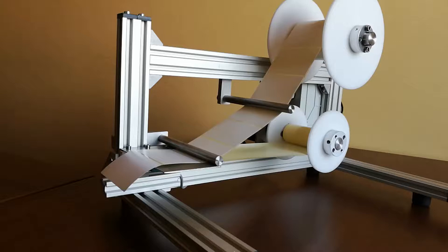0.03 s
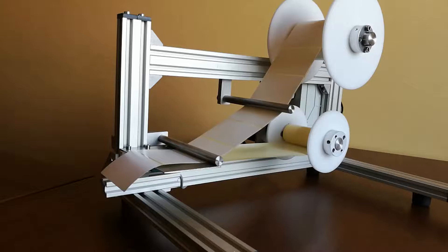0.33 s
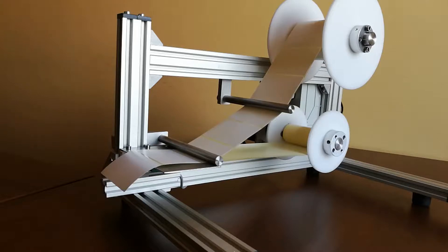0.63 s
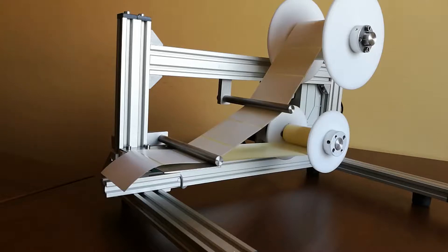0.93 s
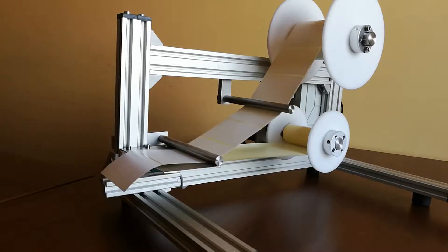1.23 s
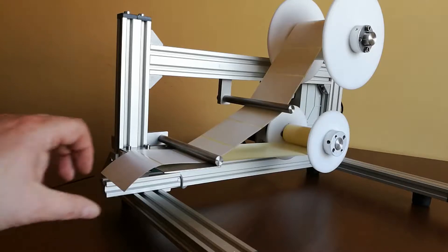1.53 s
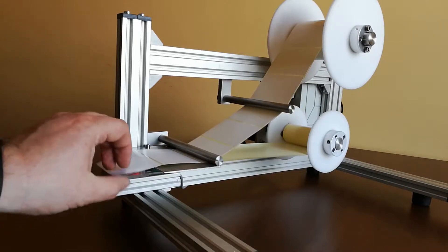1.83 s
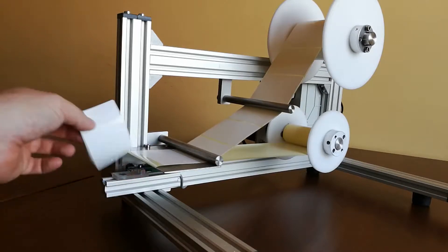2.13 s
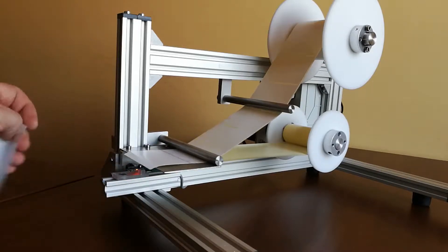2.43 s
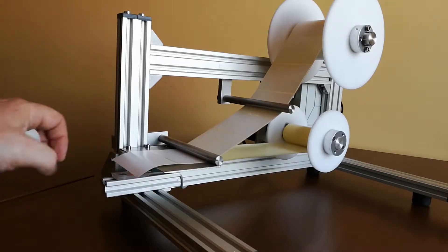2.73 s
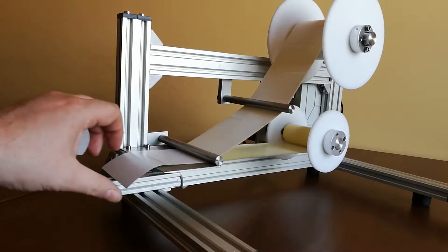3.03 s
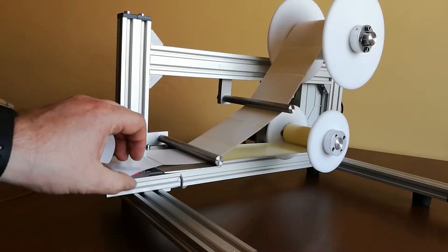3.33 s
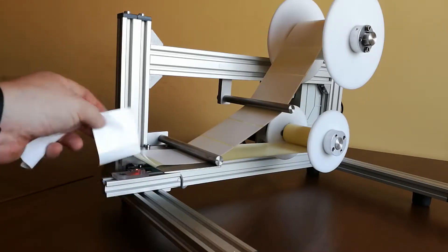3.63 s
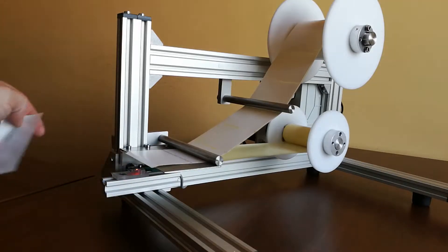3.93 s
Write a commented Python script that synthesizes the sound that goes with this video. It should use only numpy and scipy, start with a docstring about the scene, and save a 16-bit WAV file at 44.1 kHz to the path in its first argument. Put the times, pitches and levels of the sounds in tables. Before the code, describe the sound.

Close up in a small room, light clicks and rustles lead to a label being peeled off, and a dispenser motor whines for a second, shaking the table. Another label snaps free and the motor runs again briefly.

```python
"""Stepper-driven label dispenser on a table in a small room. Twice a hand snaps a label off its backing
and the motor feeds the next: step tone with overtones, frame thrum, mechanism ticks, table rumble.
The driver's current chopper hisses while the motor steps and whistles thinly while it rests.
Close by: handling clicks, crinkling paper, a swishing sleeve. Dull room noise underneath."""
import sys
import numpy as np
from scipy import signal
from scipy.fft import rfft, irfft, next_fast_len
from scipy.io import wavfile
from scipy.ndimage import map_coordinates

SR = 44100
rng = np.random.default_rng(int(sys.argv[2]) if len(sys.argv) > 2 else 0)


def int16_out(signal):
    """Quantize to a 16-bit WAV file."""
    q = np.round(np.clip(np.atleast_2d(signal).T, -1, 1) * 32767)
    wavfile.write(sys.argv[1], SR, q.astype(np.int16))


N = 176400

# motor runs: start/s, stop/s
FEEDS = [(2.114, 3.093), (3.647, 4.1)]
# step tone: t/s, left/dB, right/dB, left lead/rad
STEP_TONE = [(2.14, -44, -42, -.5), (2.2, -37.5, -51, 0), (2.24, -37, -61, -2.7), (2.35, -36, -45.5, -2.7),
             (2.58, -41, -40.5, -3.5), (2.68, -42, -42, -3.6), (2.74, -48, -38, -5),
             (2.92, -45.5, -38.5, -5.5), (3.08, -45, -37.5, -5.7), (3.68, -49, -40, -6.5),
             (3.77, -55, -43, -6.3), (3.86, -45, -41, -6.7), (4, -44.5, -41.5, -6.3)]
# whine at 3x step rate: t/s, left/dB, right/dB, left lead/rad
WHINE = [(2.25, -55, -44, -2), (2.422, -43.5, -42, -2.5), (2.6, -49, -41, -2), (2.86, -48, -50.5, 0.6),
         (3.08, -45, -51.5, 1.3), (3.68, -42.5, -51, 1.6), (3.82, -39.5, -49, -0.5), (4, -37.5, -63, 1.8)]
# weak overtones: multiple, left/dB, right/dB
OVERTONES = [(2, -56.5, -58.5), (4, -51, -56.5), (5, -61, -62), (6, -63, -58), (7, -69, -59.5)]
# frame tones: f/Hz, level/dB
THRUM = [(100.1, -49), (152.3, -56.5), (901.5, -63), (1552, -70)]

# driver hiss: f/Hz, gain/dB
HISS_SPECTRUM = [(300, -8), (600, -16), (900, -2), (2000, -1.5), (3600, 0.5), (5200, -2), (8000, -4),
                 (11200, -5), (12500, -7.5), (14000, -5)]
# hiss balance: f/Hz, L-R/dB
HISS_PAN = [(400, -4.5), (2400, -3.5), (4400, 1), (8100, 2), (11000, 14), (14000, -5.5)]
# chopper band: f/Hz, gain/dB
CHOPPER_SPECTRUM = [(12000, -45), (14200, -45), (15000, 0), (15400, -5), (15750, -14), (15900, -51)]
# resting whistle, right side: t/s, level/dB
WHISTLE_LEVEL = [(.11, -67), (.2, -49.5), (.5, -40.5), (.87, -50.5), (1.1, -44), (1.5, -50), (2.1, -49),
                 (3.1, -48), (3.22, -35.5), (3.33, -38.5), (3.66, -34.5)]
# whistle pitch: t/s, f/Hz
WHISTLE_PITCH = [(0, 15150), (3, 15151), (3.1, 15190), (3.2, 15138), (3.65, 15130)]

# mechanism ticks: t/s, relative level/dB, treble/dB, L-R/dB
TICKS = [(2.131, -20, -6, 4), (2.5205, -14, -22.5, 8), (2.571, -30, 4, 19.5), (3.672, -27.5, 10, 15.5),
         (3.8705, -24.5, -13, 6.5), (3.985, -31, -22, 7)]
# tick body: f/Hz, gain/dB
TICK_SPECTRUM = [(400, -29), (2500, -18), (4000, -4.5), (5200, 0.5), (6200, -7), (9500, -3.5), (11400, 4.5),
                 (14000, -12), (17000, -17)]
# backing web slips: t/s, length/s, level/dB, L-R/dB
WEB_SLIPS = [(2.525, 0.047, -41, 4)]
# web friction: f/Hz, gain/dB
WEB_SPECTRUM = [(500, -12.5), (1400, -1.5), (3000, -1.5), (5000, -8), (12000, -8.5), (16000, -23)]

# reel and frame rumble: t/s, relative level/dB
RUMBLE_LEVEL = [(2.05, -108), (2.146, -43), (4.0, -47.5)]
# rumble: f/Hz, gain/dB
RUMBLE_SPECTRUM = [(30, -20), (50, -5), (69, -5), (88, -7), (135, 6), (180, -7), (260, -6),
                   (500, -40), (900, -64)]
# frame jolts on start, pull and stop: t/s, level/dB
JOLTS = [(2.128, -45), (2.324, -43), (2.378, -52), (3.1, -42.5), (3.15, -43), (3.663, -45.5), (3.83, -41.5)]
# table sway: t/s, level/dB
SWAY_LEVEL = [(2.8, -91), (2.95, -48), (3.08, -45.5), (3.25, -54), (3.55, -55.5), (3.75, -70), (4, -53)]
# rubs on the table top: t/s, length/s, level/dB, L-R/dB
TABLE_RUBS = [(2.79, 0.18, -44.5, -1.5), (2.92, .14, -50, 3)]
# hollow table top: f/Hz, gain/dB
TABLE_SPECTRUM = [(185, -16), (218, -5.5), (287, 5), (308, -3), (329, 8.5), (350, -22), (372, -1.5),
                  (440, -7.5), (520, -16.5), (900, -49)]

# label snaps: t/s, relative level/dB, treble/dB, L-R/dB
SNAPS = [(1.794, -34, -4, -18), (1.7985, -25.5, 2, 13), (1.811, -29.5, -7, -2), (1.816, -27, -15, -9),
         (1.842, -32, -1, 4), (3.385, -28.5, 10, 18.5), (3.3935, -28.5, 0, -11), (3.411, -27.5, -31, -8)]
# glue tearing: t/s, length/s, level/dB, L-R/dB
PEELS = [(1.772, 0.026, -54, -16.5), (1.7995, 0.027, -41.5, 3), (3.39, 0.045, -49.5, 4)]
# label body: f/Hz, gain/dB
LABEL_SPECTRUM = [(300, -36), (520, -11.5), (720, -8.5), (880, -2), (1130, -2.5), (1430, -9.5), (1770, 0),
                  (1970, -2.5), (2350, -10), (3550, -6), (4800, -8), (6500, -14.5), (8000, -23.5),
                  (13000, -25), (16000, -47)]
# handling clicks: t/s, relative level/dB, treble/dB, L-R/dB, ring/Hz
CLICKS = [(.1855, -35.5, 12, 14, 1770), (.214, -34, 0, 11, 2480), (.278, -36, 11, 11, 4120),
          (.3465, -24, -4, 17.5, 2830), (.428, -34, -10, 18, 11000), (.4745, -26, -12, 10.5, 4400),
          (.4938, -28.5, 4, 18, 11200), (.545, -25, -8, 3, 2740), (.564, -32, 4, 5, 11600),
          (.5724, -18, 15.5, 10.5, 2560), (.6502, -23.5, -16, 1, 1900), (.6532, -23.5, -8, 15, 4800),
          (1.0655, -28, 8, 4, 5400)]
# click body: f/Hz, gain/dB
CLICK_SPECTRUM = [(200, -18), (1000, -11.5), (1800, -0.5), (2800, -4), (4500, -5.5), (7500, -8),
                  (11000, -0.5), (15000, -11), (17000, -35)]
# hand rubs: t/s, length/s, level/dB, L-R/dB
HAND_RUBS = [(.17, 0.25, -66.5, 14), (.405, 0.014, -56.5, 10), (.48, 0.072, -50.5, 10.5),
             (.58, 0.16, -61.5, 6), (1.07, 0.13, -60.5, 2)]
# hand friction: f/Hz, gain/dB
HAND_SPECTRUM = [(600, -40), (1120, 2.5), (2110, -9), (2550, 2.5), (4630, 0.5), (8190, -5), (11000, 0.5),
                 (14500, -5.5)]
# paper crinkles: t/s, length/s, level/dB, L-R/dB
CRINKLES = [(.502, .004, -41, 10), (.51, .002, -43, 10), (.52, .005, -47, 10), (.548, .005, -39.5, 12),
            (.5575, .004, -39.5, 12)]
# paper: f/Hz, gain/dB
PAPER_SPECTRUM = [(900, -22), (1900, -9), (2800, 4), (4000, -5), (7500, -11), (11200, -5), (16000, -18)]
# sleeve strokes: t/s, length/s, level/dB, L-R/dB
SLEEVE_RUBS = [(1.19, 0.29, -53.5, 5.4), (1.56, 0.16, -60.5, 1.08), (1.88, 0.36, -57, 3.8),
               (3.33, 0.075, -51, 4.6), (3.5, .15, -59, 2)]
# cloth friction: f/Hz, gain/dB
SLEEVE_SPECTRUM = [(1200, -48), (2300, -7), (3100, 4), (4500, 2.5), (9000, -3.5), (10800, 4), (14500, -4.5)]

# background: t/s, low band/dB, mid band/dB
BACKGROUND_LEVEL = [(.11, -76, -73.5), (.2, -65.5, -63), (.37, -55, -57), (.6, -57, -53),
                    (.96, -55.5, -58.5), (1.2, -58.5, -59.5), (1.5, -61, -65.5), (1.62, -62, -59),
                    (1.74, -58.5, -63.5), (1.85, -60, -65.5), (2.1, -60.5, -53.5), (2.75, -69.5, -70),
                    (3.1, -55, -44), (3.4, -58, -50.5), (3.6, -66.5, -54), (4, -58.5, -58)]
# low band: f/Hz, gain/dB
LOW_SPECTRUM = [(25, -8), (70, -13.5), (90, -10.5), (110, 1), (140, -4.5), (166, 2), (184, -3.5), (202, 3),
                (230, -4), (285, -2.5), (340, -6), (430, -6), (650, -29), (1500, -51)]
# mid band: f/Hz, gain/dB
MID_SPECTRUM = [(300, -12), (700, -8.5), (1100, -2.5), (1900, -6), (3000, -13.5), (12000, -27.5),
                (16000, -57)]
# room decay: f/Hz, T60/s
ROOM_T60 = [(150, 0.45), (1000, 0.39), (4000, 0.63), (8000, 0.47), (15000, 0.11)]

STEP_HZ, SPIN_UP_S, SPIN_DOWN_S = 801.3, 0.028, 0.0051
TIME_S = np.arange(N) / SR
SIDES = np.array([[.5], [-.5]])  # splits an L-R difference


def amp(db):
    """dB to gain."""
    return 10 ** (np.asarray(db) / 20)


def pan(side_db):
    """Stereo gains for an L-R difference."""
    return amp(SIDES * side_db)


def unit(x):
    """Scale to rms 1."""
    return x / np.sqrt(np.mean(x ** 2) + 1e-20)


def along(points, hz):
    """Interpolate on a log frequency axis."""
    knots_hz, values = np.transpose(points)
    return np.interp(np.log(hz + 1), np.log(knots_hz + 1), values)


def curves(rows):
    """Per-sample curve for each column after t."""
    knots_s, *columns = np.transpose(rows)
    return [np.interp(TIME_S, knots_s, column) for column in columns]


def wobble(rate_hz):
    """Smooth random curve, rms near 1."""
    return map_coordinates(rng.standard_normal(int(N * rate_hz / SR) + 4), [TIME_S * rate_hz])


def gate(start_s, stop_s, rise_s, fall_s):
    """Linear rise, hold, exponential fall."""
    return np.clip((TIME_S - start_s) / rise_s, 0, 1) * np.exp(-np.maximum(TIME_S - stop_s, 0) / fall_s)


def tone(hz, lead_rad=0):
    """Sine, rms 1, random start phase."""
    cycles = np.cumsum(hz * np.ones(N)) / SR + rng.random()
    return np.sqrt(2) * np.sin(2 * np.pi * cycles + lead_rad)


def filtered(x, response):
    """Zero-phase filter, gain response(hz)."""
    size = next_fast_len(N + SR // 2)
    return irfft(rfft(x, size) * response(np.fft.rfftfreq(size, 1 / SR)), size)[..., :N]


def white(size, corr):
    """Stereo white noise, L/R correlation corr."""
    return np.sqrt(corr) * rng.standard_normal(size) + np.sqrt(1 - corr) * rng.standard_normal((2, size))


def noise(spectrum, corr):
    """Coloured stereo noise, rms 1."""
    return unit(filtered(white(N, corr), lambda hz: amp(along(spectrum, hz))))


def room(x):
    """Diffuse stereo tail, new per call; top octave dies first."""
    hz, t, bins = signal.stft(rng.standard_normal((2, SR // 2)), SR, nperseg=256)
    tail = signal.istft(bins * amp(-60 * t / along(ROOM_T60, hz)[:, None]), SR, nperseg=256)[1]
    tail *= np.clip(np.arange(tail.shape[1]) / SR / 0.0039, 0, 1)
    return signal.fftconvolve(x[None], tail / np.linalg.norm(tail[0]), axes=1)[:, :N]


def impacts(rows, spectrum, t60_s, gain_db, wet_db, corr):
    """Noise bursts through a body with optional ring, plus room tail."""
    size, rise_s, ring_db, ring_oct = 4096, .0008, 9.5, 0.5
    t, hz = np.arange(size) / SR, np.fft.rfftfreq(size, 1 / SR)
    attack, decay = 1 - np.exp(-t / rise_s), amp(-60 * t / t60_s)
    shelf = hz ** 2 / (hz ** 2 + 6000 ** 2)
    out = np.zeros((2, N + SR))
    for start_s, db, treble_db, side_db, *rings_hz in rows:
        bump_db = sum(ring_db * np.exp(-(np.log2((hz + 1) / f) / ring_oct) ** 2) for f in rings_hz)
        cepstrum = irfft(np.log(amp(along(spectrum, hz) + bump_db + treble_db * shelf)))
        body = np.exp(rfft(np.r_[cepstrum[0], 2 * cepstrum[1:size // 2]], size))  # minimum phase
        crack = irfft(rfft(white(size, corr) * decay * attack) * body)
        crack = pan(side_db) * crack / np.linalg.norm(crack, axis=1, keepdims=True)
        impulse = irfft(body)
        tail = amp(wet_db) * room(impulse / np.linalg.norm(impulse))
        gain = amp(db + gain_db) * np.linalg.norm(decay)
        for part in (crack, tail):
            out[:, round(start_s * SR):][:, :part.shape[1]] += gain * part
    return out[:, :N]


def rubs(rows, spectrum, rise_s, fall_s, grain_db):
    """Strokes of grainy friction noise."""
    envelope = sum(amp(db) * pan(side_db) * gate(start_s, start_s + length_s, rise_s, fall_s)
                   for start_s, length_s, db, side_db in rows)
    return envelope * unit(noise(spectrum, corr=0.061) * amp(grain_db * wobble(500) + 1.8 * wobble(24.48)))


def motor(ring_db=-49.5, ring_s=0.045, linger_db=-54.5, linger_s=0.29, wet_db=-11.5):
    """Step tone shifting as the reels turn, overtones, frame thrum; the frame rings on after a stop."""
    step_hz = STEP_HZ * (1 + 0.001 * wobble(30.89))
    tones = np.zeros((2, N))
    for multiple, rows in ((1, STEP_TONE), (3, WHINE)):
        left_db, right_db, lead_rad = curves(rows)
        level_db = np.array([left_db, right_db]) + .6 * wobble(260)
        tones += amp(level_db) * tone(multiple * step_hz, SIDES * lead_rad)
    for multiple, left_db, right_db in OVERTONES:
        phase_rad = SIDES * 1.2 + .4 * wobble(60)
        level_db = np.array([[left_db], [right_db]]) + 2.3 * wobble(16)
        tones += amp(level_db) * tone(multiple * step_hz, phase_rad)
    for hz, db in THRUM:
        tones += amp(db + 1.7 * wobble(29.79)) * tone(hz * step_hz / STEP_HZ, 0.37 * wobble(30))
    tones *= sum(gate(start_s, stop_s, SPIN_UP_S, SPIN_DOWN_S) for start_s, stop_s in FEEDS)
    after_stop = sum(amp(ring_db) * gate(stop_s, stop_s + ring_s, SPIN_DOWN_S, SPIN_DOWN_S)
                     + amp(linger_db) * gate(stop_s, stop_s, SPIN_DOWN_S, linger_s) for _, stop_s in FEEDS)
    ring = after_stop * pan(9.7) * tone(STEP_HZ)
    tail = room(filtered(tones.mean(axis=0), lambda hz: hz > 300))
    return tones + ring + amp(wet_db) * tail


def driver(hiss_db=-42.5, fizz_db=-47.5, whistle_left_db=-19):
    """Current chopper in the windings: hiss when stepping, whistle when holding."""
    running = sum(gate(start_s - .006, stop_s, rise_s=0.018, fall_s=.035) for start_s, stop_s in FEEDS)
    resting = 1 - sum(gate(start_s, stop_s, SPIN_DOWN_S, SPIN_DOWN_S) for start_s, stop_s in FEEDS)
    hiss = filtered(noise(HISS_SPECTRUM, corr=0.068), lambda hz: pan(along(HISS_PAN, hz)))
    hiss *= amp(hiss_db + 0.12 * wobble(5.62) + 0.66 * wobble(400))
    fizz = amp(fizz_db) * pan(-6.5) * noise(CHOPPER_SPECTRUM, corr=0)
    whistle_db = curves(WHISTLE_LEVEL)[0]
    whistle_hz = curves(WHISTLE_PITCH)[0] + 3 * wobble(40)
    whistle = np.array([amp(whistle_db + side_db + 2.8 * wobble(11) + 1.1 * wobble(70)) * tone(whistle_hz)
                        for side_db in (whistle_left_db, 0)])
    return running * (hiss + fizz) + resting * whistle


def feed_mechanism():
    """The mechanism ticks; the backing web slips once."""
    ticks = impacts(TICKS, TICK_SPECTRUM, t60_s=0.0064, gain_db=-2.5, wet_db=-3.5, corr=0.26)
    return ticks + rubs(WEB_SLIPS, WEB_SPECTRUM, rise_s=0.018, fall_s=0.027, grain_db=-0.5)


def table(frame_hz=66.3, sway_hz=17):
    """The feed shakes and jolts frame and table; the table sways, its top rubs hollowly."""
    rumble = amp(curves(RUMBLE_LEVEL)[0] - 12.5) * noise(RUMBLE_SPECTRUM, corr=1)
    jolts = sum(amp(db) * gate(t, t, rise_s=0.0059, fall_s=0.062) * tone(frame_hz) for t, db in JOLTS)
    sway = tone(sway_hz) + .5 * noise([(10, 6), (20, 2), (30, 4), (50, -33)], corr=1)
    sway *= amp(curves(SWAY_LEVEL)[0])
    rubbing = rubs(TABLE_RUBS, TABLE_SPECTRUM, rise_s=0.11, fall_s=0.063, grain_db=4)
    return rumble + jolts + sway + rubbing


def label():
    """Glue tears; the label snaps off its backing."""
    snaps = impacts(SNAPS, LABEL_SPECTRUM, t60_s=.035, gain_db=-8.5, wet_db=3.5, corr=1)
    return snaps + rubs(PEELS, LABEL_SPECTRUM, rise_s=0.0016, fall_s=.012, grain_db=3.2)


def handling():
    """Close clicks and rubs of the hand."""
    clicks = impacts(CLICKS, CLICK_SPECTRUM, t60_s=0.0052, gain_db=-6, wet_db=-6, corr=0.49)
    return clicks + rubs(HAND_RUBS, HAND_SPECTRUM, rise_s=0.011, fall_s=0.062, grain_db=0)


def paper():
    """Paper crinkles in millisecond bursts."""
    return rubs(CRINKLES, PAPER_SPECTRUM, rise_s=0.0019, fall_s=0.0023, grain_db=3.2)


def sleeve():
    """Sliding cloth swishes."""
    return rubs(SLEEVE_RUBS, SLEEVE_SPECTRUM, rise_s=0.043, fall_s=0.057, grain_db=0.5)


def background():
    """Dull room noise, swelling with movement at the table."""
    low_db, mid_db = curves(BACKGROUND_LEVEL)
    return amp(low_db) * noise(LOW_SPECTRUM, corr=0.92) + amp(mid_db) * noise(MID_SPECTRUM, corr=0.044)


def scene():
    """Machine, hand, room noise."""
    machine = motor() + driver() + feed_mechanism() + table()
    hand = label() + handling() + paper() + sleeve()
    return machine + hand + background()


def record(dry):
    """Brief silence, fade-in, brick-wall low-pass."""
    start_s, fade_s, cutoff_hz = .11, 0.017, 15850
    return filtered(dry * np.clip((TIME_S - start_s) / fade_s, 0, 1), lambda hz: hz < cutoff_hz)


dry = scene()
out = record(dry)
int16_out(out)
```